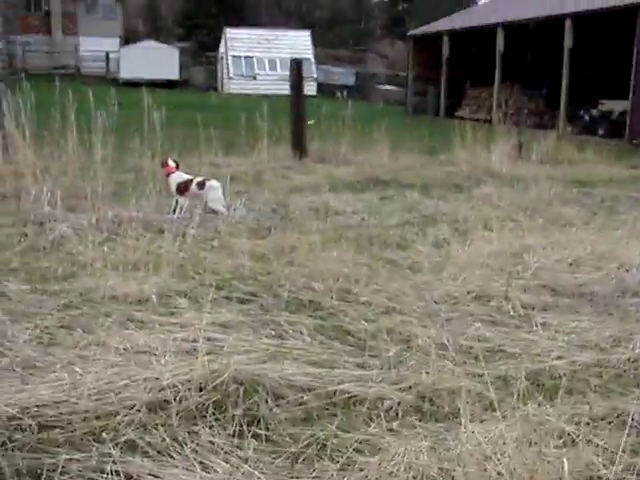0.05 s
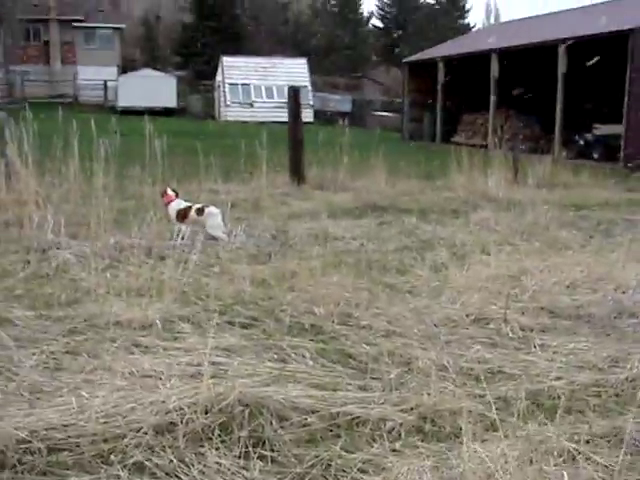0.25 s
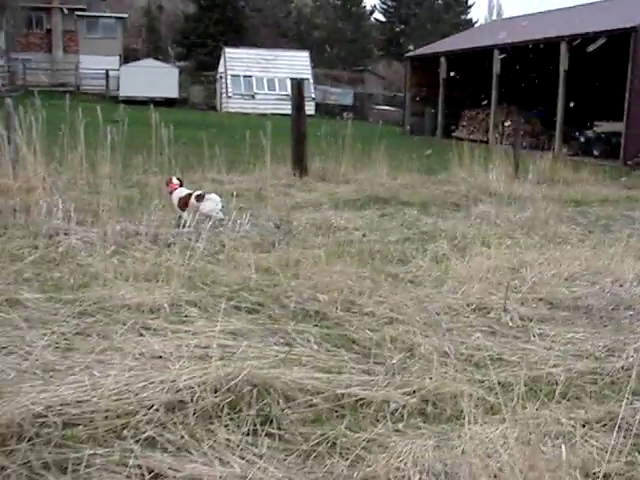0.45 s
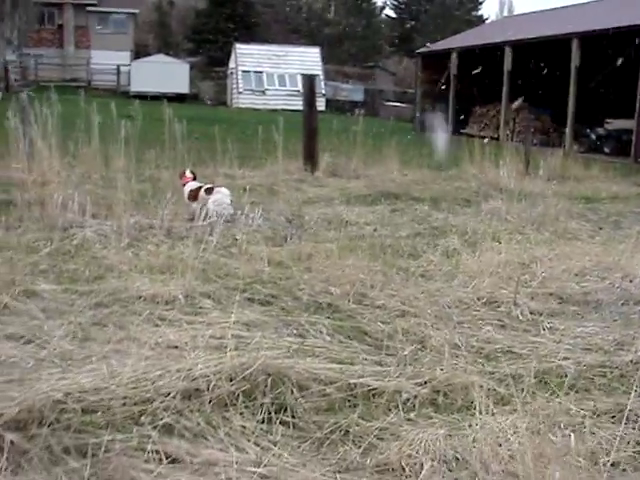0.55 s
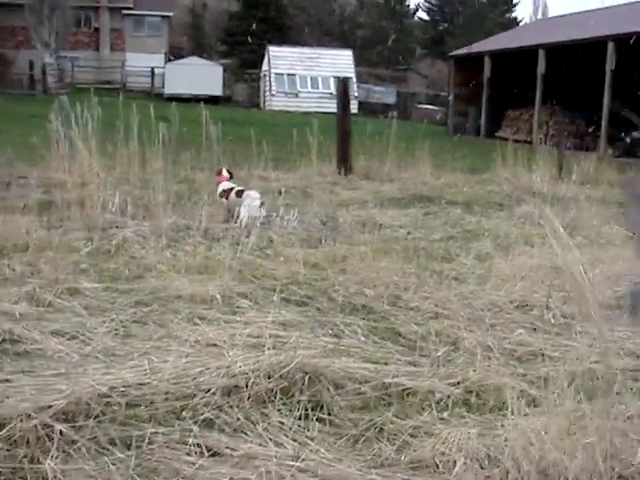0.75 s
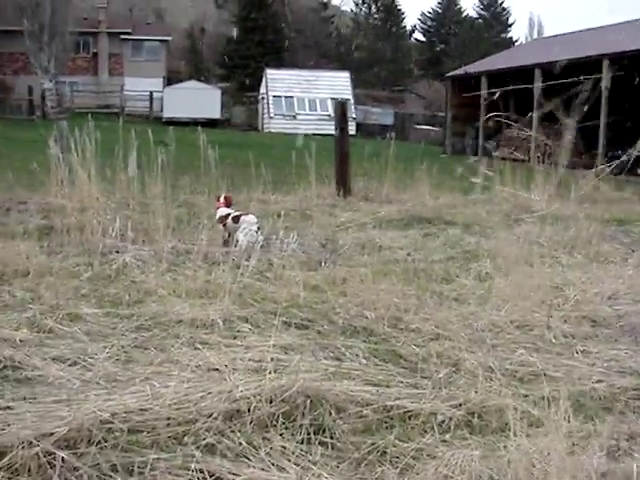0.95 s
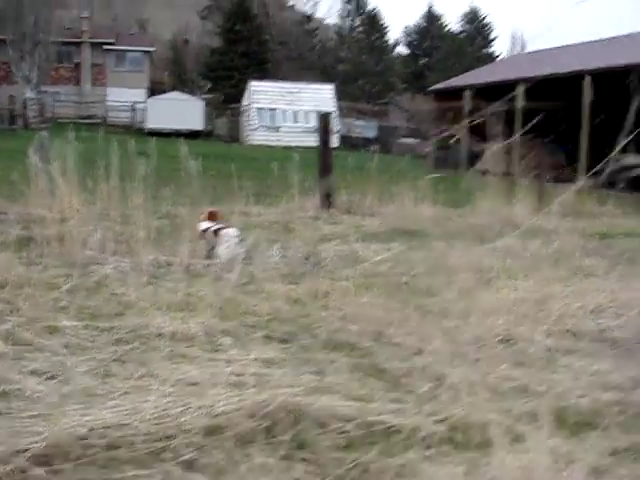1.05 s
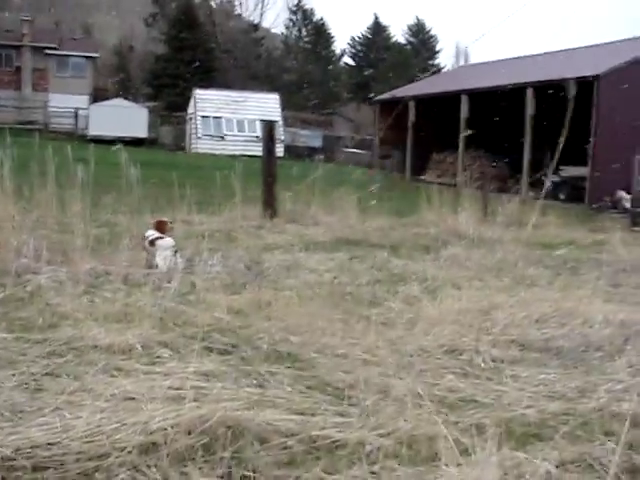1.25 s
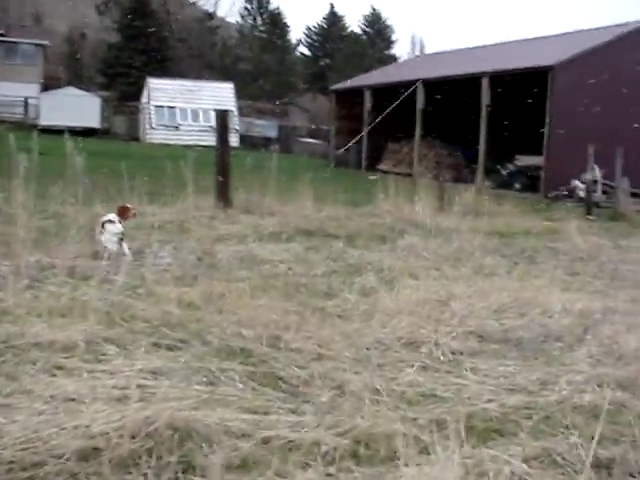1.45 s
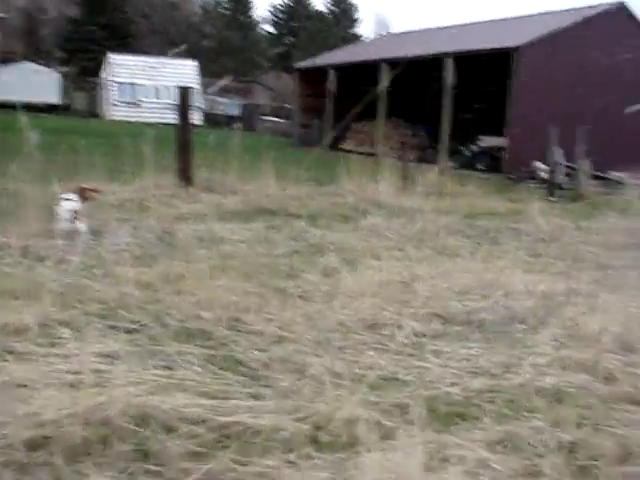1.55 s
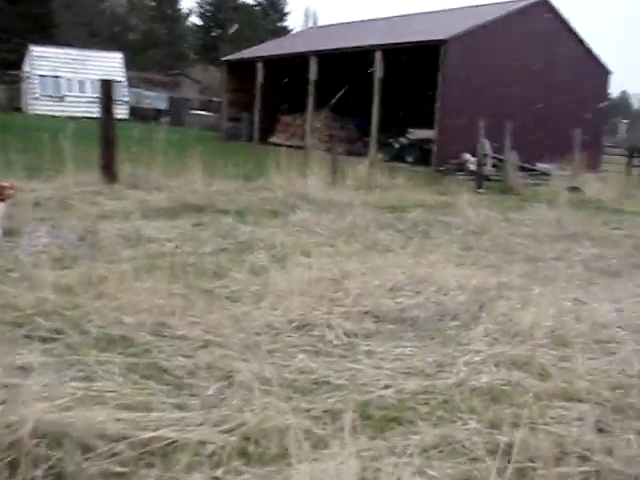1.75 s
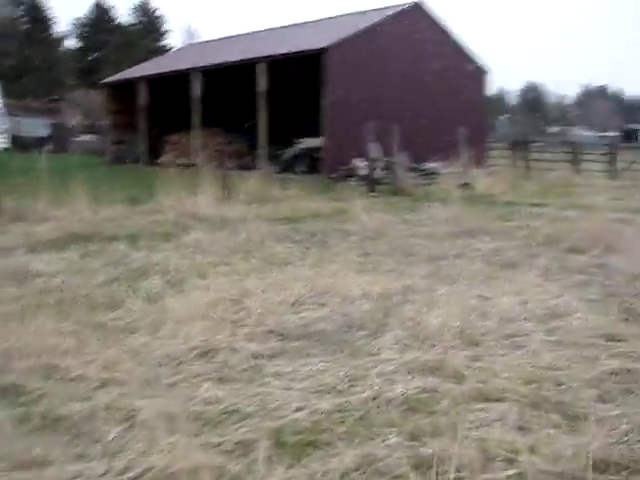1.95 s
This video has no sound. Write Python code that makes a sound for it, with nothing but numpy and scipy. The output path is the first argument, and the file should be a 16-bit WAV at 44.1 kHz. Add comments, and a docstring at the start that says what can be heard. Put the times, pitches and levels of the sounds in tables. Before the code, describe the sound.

Quick wingbeats clap and swish as a bird flies off, slowly fading. Just before, wind buffets the microphone and a launcher releases the bird with brief squeaks and a crackle of dry grass. Soft outdoor hiss lies underneath.

```python
"""A bird flaps away over an open field, thrown from a spring launcher hidden in dry grass.
Its wing tips clap about twice a cycle, with air swishing and the flight feathers whistling between.
The launch is a few thin squeaks and a burst of straw and feathers. A gust buffets the one
microphone at first; far off, an engine hums under the hiss of the field."""
import sys
import numpy as np
from scipy import signal
from scipy.fft import rfft, irfft
from scipy.io import wavfile
from scipy.ndimage import uniform_filter1d

SR = 44100
rng = np.random.default_rng(int(sys.argv[2]) if len(sys.argv) > 2 else 0)


def int16_out(signal):
    """Quantize to a 16-bit WAV file."""
    q = np.round(np.clip(np.atleast_2d(signal).T, -1, 1) * 32767)
    wavfile.write(sys.argv[1], SR, q.astype(np.int16))


N = 88200
TIME = np.arange(N) / SR


def amp(db):
    """Decibels to gain."""
    return 10 ** (np.asarray(db) / 20)


def unit(x):
    """Scales to rms 1."""
    return x / np.sqrt(np.mean(x ** 2) + 1e-20)


def bell(x, width):
    """A Gaussian bump of height 1 at x = 0."""
    return np.exp(-.5 * (x / width) ** 2)


def curve(rows, column=1):
    """One column of a time table at every sample."""
    rows = np.array(rows)
    return np.interp(TIME, rows[:, 0], rows[:, column])


def add(mix, start_s, sound):
    """Mixes a sound in at a time."""
    part = mix[max(0, round(start_s * SR)):][:len(sound)]
    part += sound[:len(part)]


def colour(spectrum, size=4096):
    """Causal impulse response with the given spectrum."""
    hz, db = np.transpose(spectrum)
    bin_hz = abs(np.fft.fftfreq(size, 1 / SR)) + 1
    log_gain = np.log(amp(np.interp(np.log(bin_hz), np.log(hz), db)))
    minimum_phase = np.exp(np.conj(signal.hilbert(log_gain)))
    return np.fft.ifft(minimum_phase).real[:size // 2]


def drift(rate_hz, size=N):
    """Smooth random motion of rms about 1."""
    hz = np.fft.rfftfreq(N, 1 / SR)
    lowpass = np.exp(-(hz / rate_hz) ** 2) * (hz > 0)
    return unit(irfft(rfft(rng.standard_normal(N)) * lowpass, N))[:size]


def noise(spectrum, grain_db, grain_hz):
    """Coloured noise whose strength flickers in grains."""
    grains = rng.standard_normal(N) * amp(grain_db * np.clip(drift(grain_hz), -2, 2))
    return unit(signal.fftconvolve(grains, colour(spectrum))[:N])


def whistle(hz, waver_hz, rate_hz=300, rasp_db=3):
    """A thin, raspy tone that wavers about a pitch curve."""
    phase = 2 * np.pi * np.cumsum(hz + waver_hz * drift(rate_hz, len(hz))) / SR
    return unit(amp(rasp_db * drift(rate_hz, len(hz))) * np.sin(phase))


def glide(length_s, from_hz, to_hz, db, waver_hz):
    """A short wavering tone that swells, slides and fades."""
    progress = np.arange(0, length_s, 1 / SR) / length_s
    return amp(db) * np.sin(np.pi * progress) * whistle(from_hz + (to_hz - from_hz) * progress, waver_hz)


# Engine, far off: (time [s], pitch [Hz], level [dB])
ENGINE_HUM = [(0, 79.64, -43.5), (1.1, 71.23, -44), (1.45, 74.6, -49.5), (1.65, 75.2, -47),
              (1.85, 77.7, -48.5), (2, 80.4, -46.5)]


def far_engine():
    """A distant engine reaches the microphone as one low, unsteady tone."""
    db = curve(ENGINE_HUM, column=2) + 1.2 * drift(9.9)
    phase = 2 * np.pi * np.cumsum(curve(ENGINE_HUM)) / SR
    return np.sqrt(2) * amp(db) * np.sin(phase)


# Open air and dry grass around the microphone: (frequency [Hz], level [dB])
HISS_SPECTRUM = [(20, -4), (100, -38), (200, -1.5), (400, 1.5), (800, 1.5), (1500, 1.5), (2500, -4),
                 (4000, -2), (6000, -13.5), (10000, -15)]
GRASS_SPECTRUM = [(1000, -42), (2500, 3), (4500, 1), (7000, 9), (10000, -1)]
# Their rise and fall: (time [s], level [dB])
HISS_LEVEL = [(0, -44.5), (.12, -45.5), (.45, -42.5), (1.3, -56.5), (1.5, -41.5), (1.78, -40), (2, -36.5)]
GRASS_LEVEL = [(0, -59), (.45, -52), (1.35, -52), (1.5, -45), (1.65, -46), (1.76, -50), (1.88, -44)]


def field():
    """Open-air hiss and the grainy fizz of dry grass."""
    hiss = amp(curve(HISS_LEVEL)) * noise(HISS_SPECTRUM, grain_db=2, grain_hz=60)
    grass = amp(curve(GRASS_LEVEL)) * noise(GRASS_SPECTRUM, grain_db=8.5, grain_hz=387)
    return hiss + grass


# Gust, right on the microphone: (time [s], level [dB])
GUST_LEVEL = [(0, -39.5), (.08, -32), (.11, -41), (.195, -32.5), (.235, -22), (.27, -31.5), (.285, -22.5),
              (.34, -25.5), (.39, -21.5), (.47, -21), (.55, -16), (.605, -17), (.68, -26), (.8, -26),
              (.92, -35), (1.1, -39), (1.22, -41.5), (1.35, -57)]
# Its rumble: (frequency [Hz], level [dB])
GUST_SPECTRUM = [(20, -14.5), (45, -8.5), (85, -2.5), (150, -2), (280, -1), (440, -7), (620, -19),
                 (1000, -41.5), (2500, -42)]
# Single thumps of air on the microphone: (time [s], peak level [dB], pitch [Hz])
AIR_THUMPS = [(.129, -18.5, 157), (0.244, -11.5, 177), (0.283, -23, 246), (0.365, -10.5, 148),
              (0.405, -7, 141), (0.488, -15, 134), (0.514, -8, 153), (0.61, -2.5, 234), (.655, -16.5, 158),
              (.714, -11, 167), (0.751, -17.5, 127), (0.776, -15.5, 315), (0.873, -25, 69),
              (1.054, -22.5, 162), (1.175, -26.5, 169), (1.967, -20, 736)]


def gust(dull_hz=273.5, db_per_doubling=9, eddy_hz=150.2, eddy_db=-4.5, tilt_db=-6, thump_cycles=.48):
    """Lumpy turbulence brightens as it grows and breaks into a flutter of eddies, with single thumps."""
    db = curve(GUST_LEVEL)
    rumble = noise(GUST_SPECTRUM, grain_db=3.5, grain_hz=59.6)
    dull = signal.sosfiltfilt(signal.butter(2, dull_hz, fs=SR, output="sos"), rumble)
    brightness = 2 ** ((db - db.max()) / db_per_doubling)
    # Eddies: an uneven train of sharp pressure peaks.
    phase = 2 * np.pi * np.cumsum(eddy_hz * np.exp(.42 * drift(eddy_hz))) / SR
    eddies = unit(sum(amp(tilt_db * k) * np.cos(k * phase) for k in range(1, 5)))
    out = amp(db) * (dull + brightness * (rumble - dull + amp(eddy_db) * eddies))
    for at_s, peak_db, hz in AIR_THUMPS:
        cycles = (TIME - at_s) * hz
        out += amp(peak_db) * bell(cycles, thump_cycles) * np.cos(2 * np.pi * cycles)
    return out


# Straw and feathers at the launcher, down in the grass: (time [s], level [dB])
RUSTLE_LEVEL = [(.56, -30.5), (.568, -19), (.584, -22.5), (.6, -21.5), (.621, -20), (.628, -21.5),
                (.645, -21.5), (.67, -29), (.7, -30.5), (.745, -31.5), (.765, -28), (.788, -40),
                (.803, -32.5), (.83, -27), (.85, -42), (.89, -38.5), (.92, -42), (.945, -47), (1.05, -38.5),
                (1.2, -94)]
# Their colour: (frequency [Hz], level [dB])
RUSTLE_SPECTRUM = [(200, 0), (600, -5), (1200, -2), (2000, 0), (2800, 2), (4900, -2.5), (5700, -10.5),
                   (8000, -8.5), (10000, -15)]
# Squeaks around the launch: (time [s], length [s], start pitch [Hz], end pitch [Hz], level [dB])
LAUNCH_SQUEAKS = [(.472, .046, 4280, 3520, -35.5), (.455, .036, 3030, 2950, -43),
                  (.46, .044, 6250, 5900, -46), (.628, .016, 4600, 4480, -22),
                  (.631, .014, 5000, 5150, -25), (.657, .026, 3550, 3150, -28),
                  (.738, .016, 4000, 3900, -33)]


def launch(spring_s=.5608):
    """The launcher springs in a crackling burst of straw and feathers, amid thin squeaks."""
    rustle = noise(RUSTLE_SPECTRUM, grain_db=3.5, grain_hz=940)
    out = (TIME > spring_s) * amp(curve(RUSTLE_LEVEL)) * rustle
    for start_s, *squeak in LAUNCH_SQUEAKS:
        add(out, start_s, glide(*squeak, waver_hz=180))
    return out


# Wing cycles, fading as the bird leaves the microphone: (time [s], level [dB])
WING_CYCLES = [(.64, -48), (.753, -37), (.881, -33.5), (.986, -33.5), (1.092, -33), (1.201, -37),
               (1.311, -37), (1.425, -38), (1.536, -41), (1.654, -42), (1.772, -45.5), (1.896, -51)]
# Air over the wings: (frequency [Hz], level [dB])
SWISH_SPECTRUM = [(100, -24), (350, -5), (700, -2), (1200, 2.5), (1650, -2), (2200, 1), (3500, -3),
                  (5500, -32), (10000, -44.5)]


def wing_air(cycle_s=.112, top_hz=1120, whistle_db=-2.5, octave_db=-5, stall_s=.006, stall_delay_s=.014):
    """Air swishes on both strokes; the flight feathers whistle up and down in pitch once a cycle."""
    level, tones = np.zeros(N), np.zeros(N)
    progress = np.arange(0, cycle_s, 1 / SR) / cycle_s
    wing_speed = amp(-2) * bell(progress - .29, .15) + bell(progress - .84, .15)
    hz = top_hz * np.exp(-2.3 * (progress - .71) ** 2)
    for start_s, db in WING_CYCLES:
        tone = whistle(hz, waver_hz=35) + amp(octave_db) * whistle(2 * hz, waver_hz=70)
        add(level, start_s, amp(db) * wing_speed)
        add(tones, start_s, amp(db + whistle_db) * wing_speed * tone)
    air = level * noise(SWISH_SPECTRUM, grain_db=3.5, grain_hz=400) + tones
    # The air stalls just after each clap, most after the hard ones.
    hardest_db = max(row[1] for row in WING_CLAPS)
    for clap_s, db, *_ in WING_CLAPS:
        depth = .65 * amp((db - hardest_db) / 2)
        air *= 1 - depth * bell(TIME - clap_s - stall_delay_s, stall_s)
    whoo = glide(length_s=.068, from_hz=440, to_hz=360, db=-41, waver_hz=25.2)
    add(air, 1.205, whoo)  # one low breath of air between beats
    return air


# Wing slaps and claps, first inside the straw, then out over the field:
# (time [s], level [dB], ring pitch [Hz], ring offset [dB], pat offset [dB], rattle offset [dB])
WING_CLAPS = [(.5660, -10, 3800, 7, 7, -2), (0.5826, -16, 3260, 8.5, -3, -6),
              (0.6154, -9, 1470, -1, -10, -5), (0.6269, -11, 2850, 10.5, -3, 2.5),
              (.642, -18.5, 3960, 13, -16, 6), (0.7522, -1, 3100, -5, -16, -1.5),
              (0.809, -13.5, 3100, 2, -1, 3), (0.826, -15.5, 3280, -6, -14, 1),
              (0.8312, -16.5, 2340, 8.5, 4, 1.5), (0.869, -12.5, 3270, -5, 3, -0.5),
              (0.8738, -14.5, 4300, 2, -20, -1.5), (0.881, -17, 2210, 12, -7, 2.5),
              (0.8832, -19, 2200, -0.5, 4, 6.5), (0.9348, -20, 3070, -5, 1, 1.5),
              (0.986, -17.5, 2460, 11.5, -1, 4), (1.0161, -20.5, 3400, -13, -3, 7.5),
              (1.0917, -10, 2350, -20, 8.5, 1), (1.1430, -12, 2400, -5, -9, -8),
              (1.2001, -9.5, 3440, -2.5, 2, -0.5), (1.2508, -27, 2400, 20.5, -22, 11),
              (1.3110, -14.5, 2200, -13, 3.5, -5.5), (1.3605, -11, 2620, 5, -3.5, -3),
              (1.4243, -13.5, 3060, -3, -15, -10), (1.4722, -19.5, 2800, -11, 3.5, 2.5),
              (1.5368, -18.5, 2470, -3.5, 10.5, -1), (1.654, -15, 3060, -11, -3.5, -5.5),
              (1.7031, -16.5, 2240, 5, 8, -4.5), (1.7740, -11.5, 3340, -4.5, -10, -12.5),
              (1.8200, -19.5, 2240, 3, 11.5, -20), (1.8238, -19, 2375, 10, -2, -1.5),
              (1.8966, -17, 2380, -3, -11, -7), (1.948, -18, 2660, 2.5, -4, -8.5)]
# Crack and rattle of the feathers: (frequency [Hz], level [dB])
CRACK_SPECTRUM = [(100, -13.5), (400, -4.5), (1000, 3), (1700, -1), (2200, 2), (4200, -0.5), (6000, -4.5),
                  (10000, -14)]


def wing_claps():
    """Wing tips meet: a crack, a ring of trapped air, a low pat, a rattle and faint hiss of feathers."""
    ring_s, upper_ratio, upper_db = .00046, 1.334, -4  # the pocket of air has a second, higher ring
    pat_hz, pat_s, puff_hz, puff_s = 850, .0011, 248, .0079
    rattle_rise_s, rattle_s, feather_hiss_s = .00054, .0044, .0037
    out, crack = np.zeros(N), colour(CRACK_SPECTRUM)
    t = TIME[:len(crack)]
    turn = 2 * np.pi * t
    for start_s, db, hz, ring_db, pat_db, rattle_db in WING_CLAPS:
        squeeze = amp(ring_db - 6) * t / ring_s * np.exp(1 - t / ring_s)
        ring = squeeze * (np.sin(turn * hz) + amp(upper_db) * np.sin(turn * upper_ratio * hz))
        pat = amp(pat_db - 10.5) * np.exp(-t / pat_s) * np.sin(turn * pat_hz)
        puff = amp(pat_db - 31.5) * np.exp(-t / puff_s) * np.sin(turn * puff_hz)
        rattle = amp(rattle_db - 6) * (1 - np.exp(-t / rattle_rise_s)) * np.exp(-t / rattle_s)
        feather_hiss = amp(-32) * np.exp(-t / feather_hiss_s)
        feathers = noise(CRACK_SPECTRUM, grain_db=2, grain_hz=1980)[-len(t):] * (rattle + feather_hiss)
        add(out, start_s, amp(db) * (crack / crack.max() + ring + pat + puff + feathers))
    return out


def scene():
    """The bird and the field around it, at one microphone."""
    return (wing_claps() + wing_air() + launch() + gust() + far_engine() + field())[None]


def record(dry, limit_db=-8.5, recover_db_per_s=316, cutoff_hz=10080):
    """Behind the microphone, a quick limiter holds the peaks and a steep low-pass cuts the top."""
    recovery_db = TIME * recover_db_per_s
    peak_db = 20 * np.log10(abs(dry[0]) + 1e-9)
    held_db = np.maximum.accumulate(peak_db + recovery_db) - recovery_db
    over_db = np.maximum(held_db - limit_db, 0)
    limited = dry / amp(uniform_filter1d(over_db, size=24))
    lowpass = signal.firwin(601, cutoff_hz, window=("kaiser", 8), fs=SR)
    return signal.oaconvolve(limited, lowpass[None], "same")


dry = scene()
out = record(dry)
int16_out(out)
```